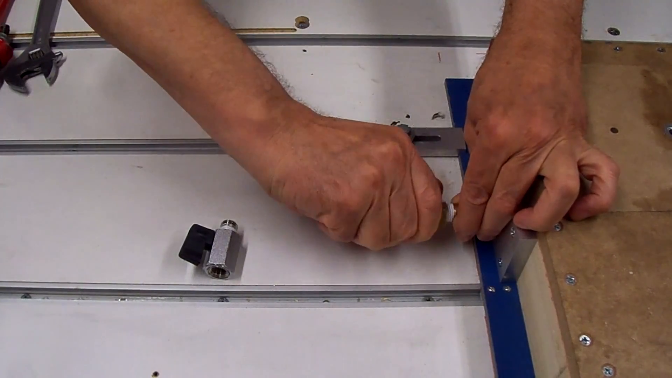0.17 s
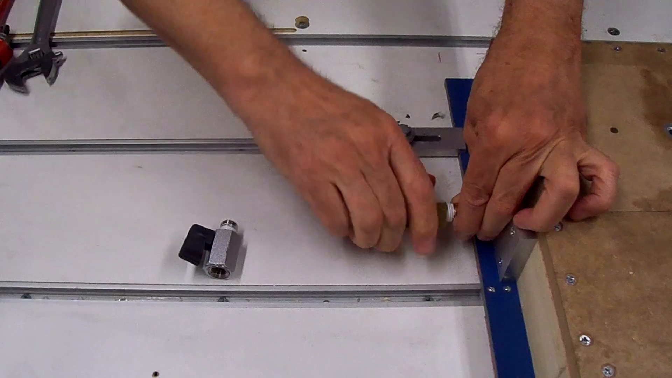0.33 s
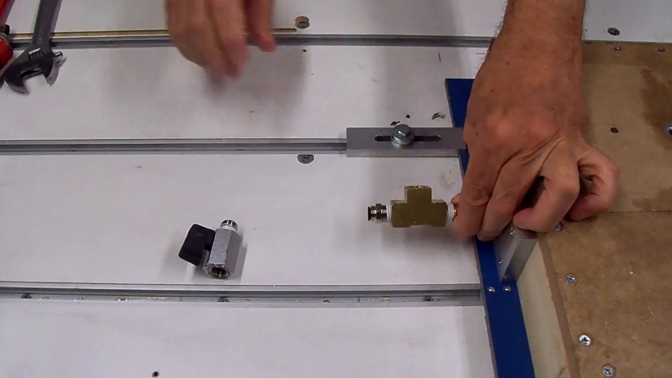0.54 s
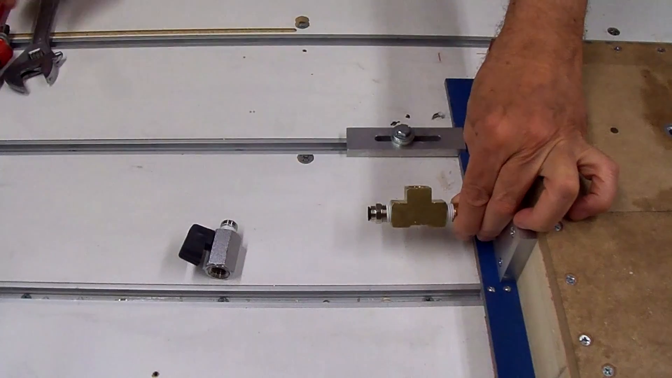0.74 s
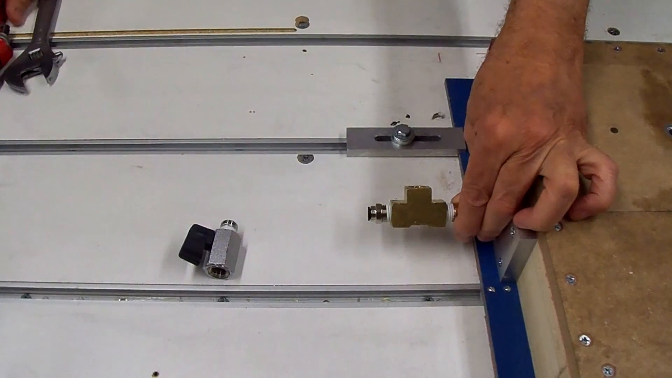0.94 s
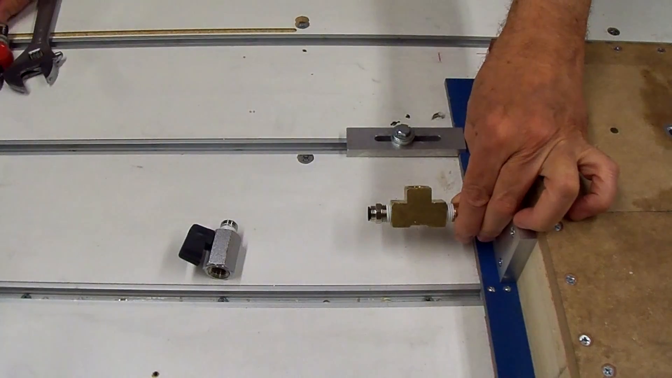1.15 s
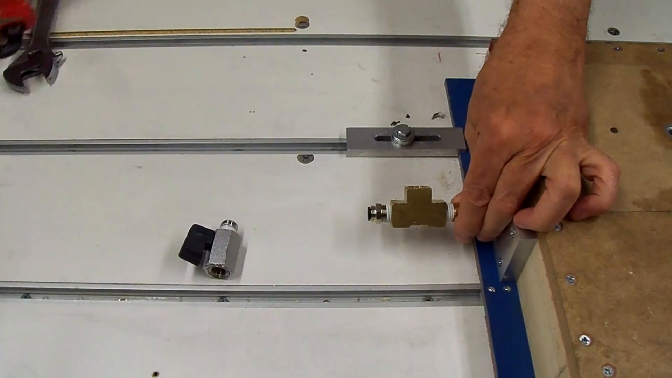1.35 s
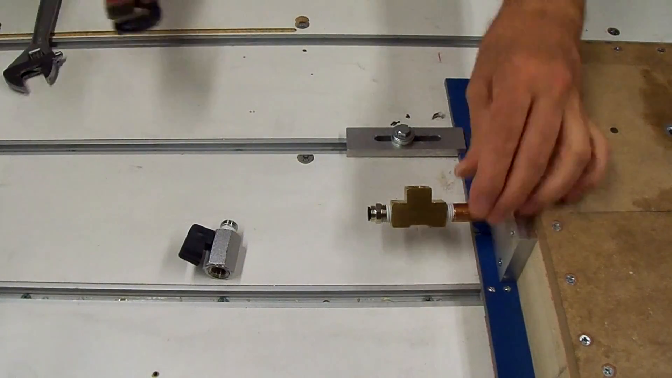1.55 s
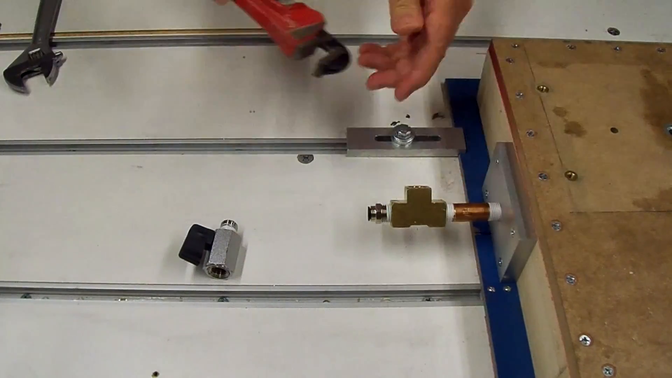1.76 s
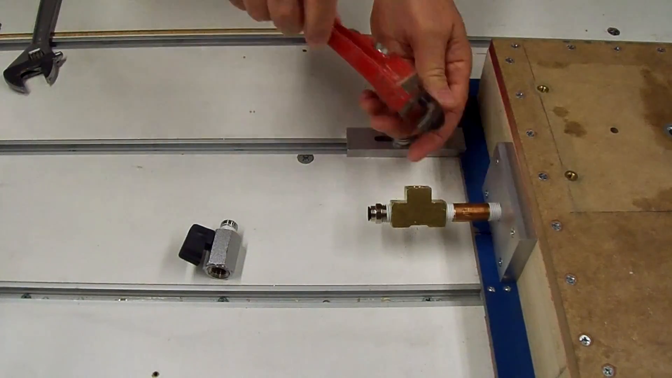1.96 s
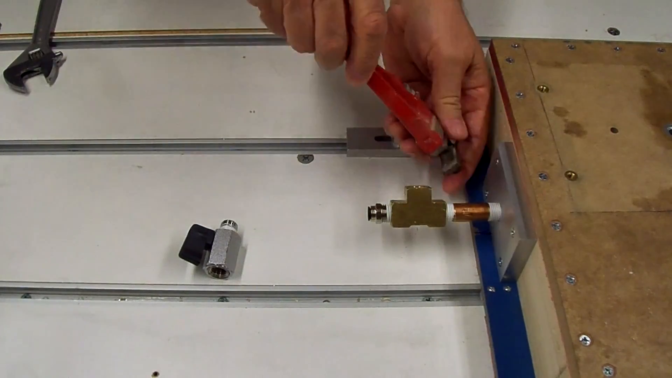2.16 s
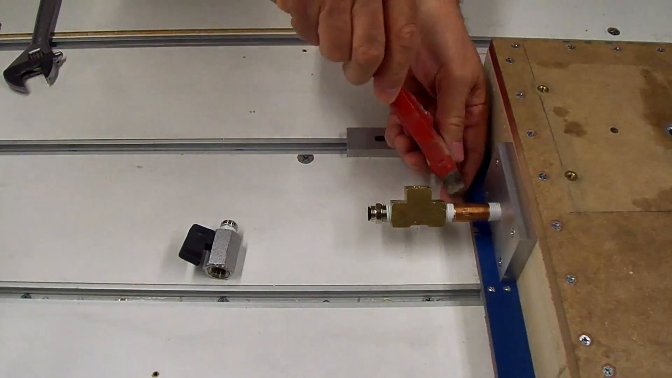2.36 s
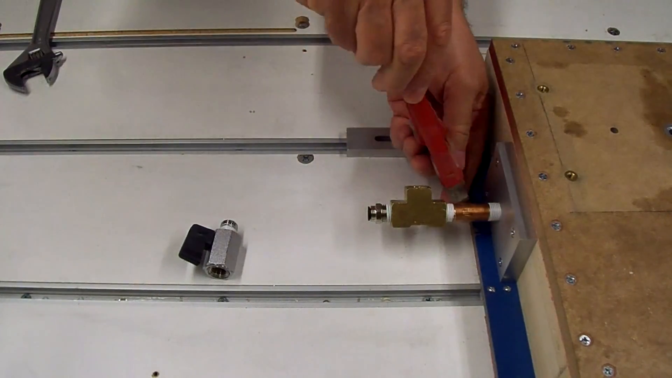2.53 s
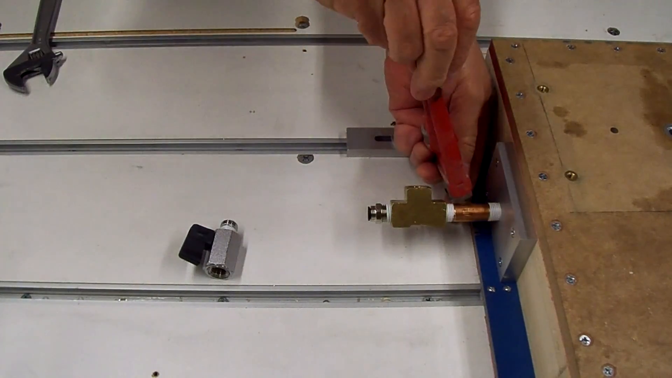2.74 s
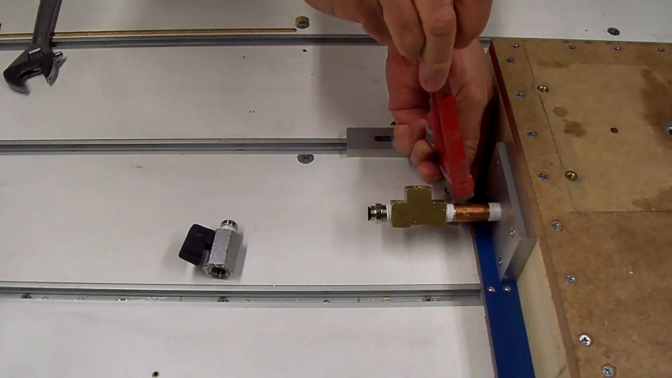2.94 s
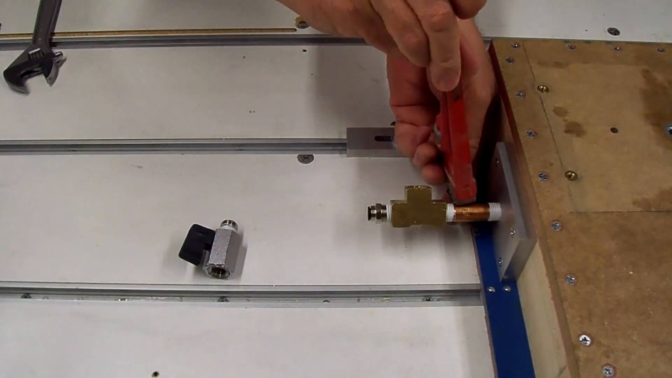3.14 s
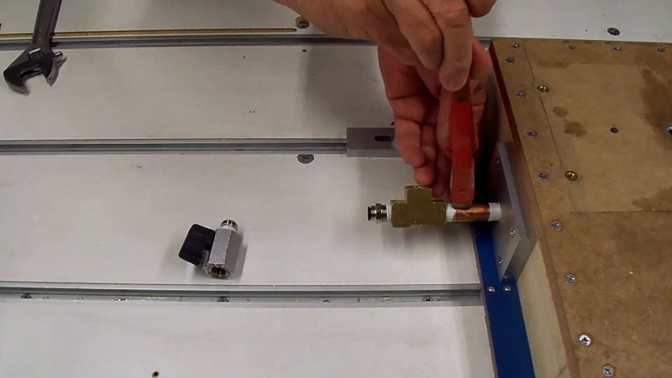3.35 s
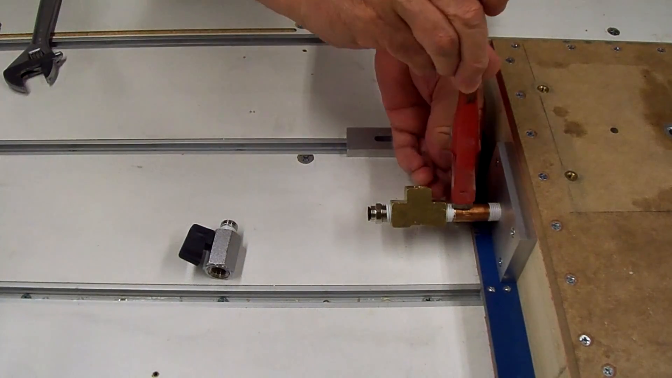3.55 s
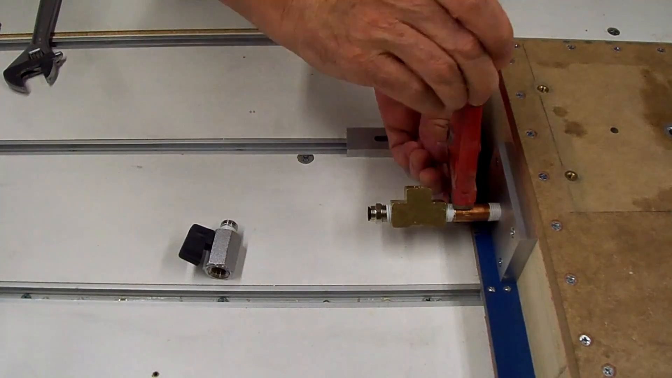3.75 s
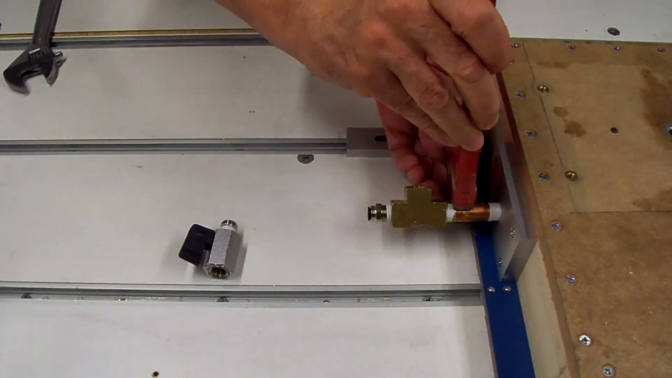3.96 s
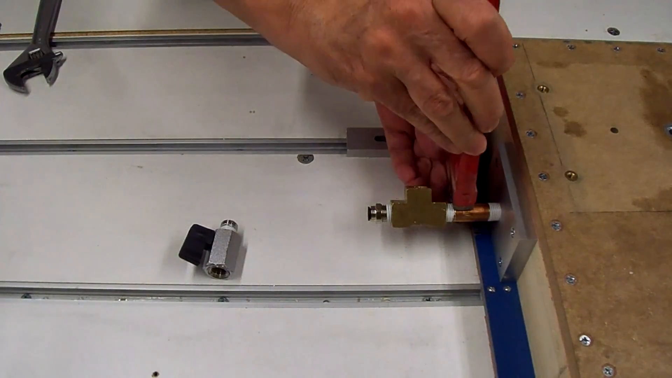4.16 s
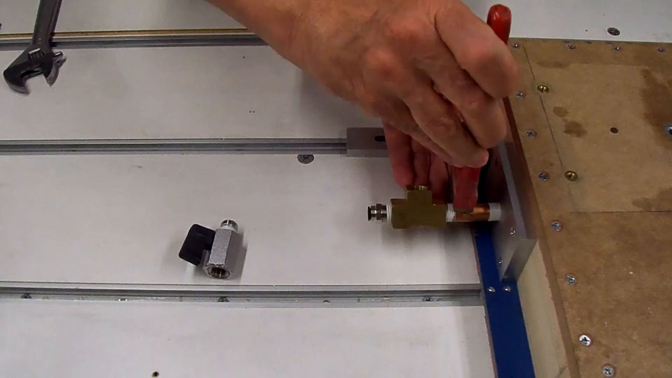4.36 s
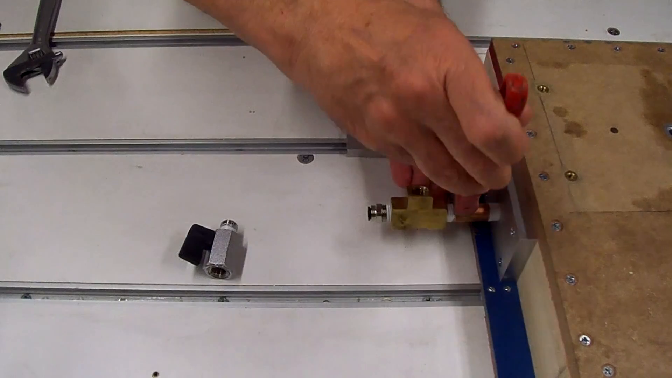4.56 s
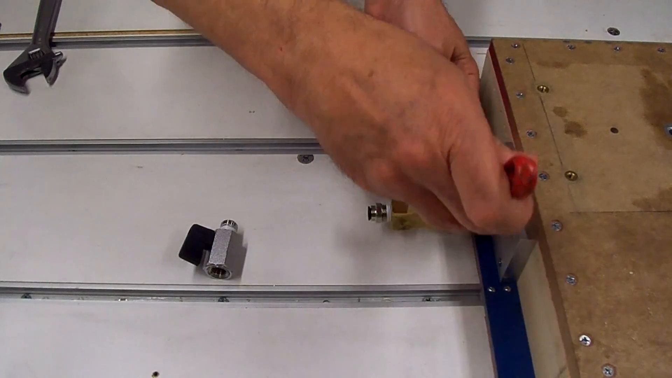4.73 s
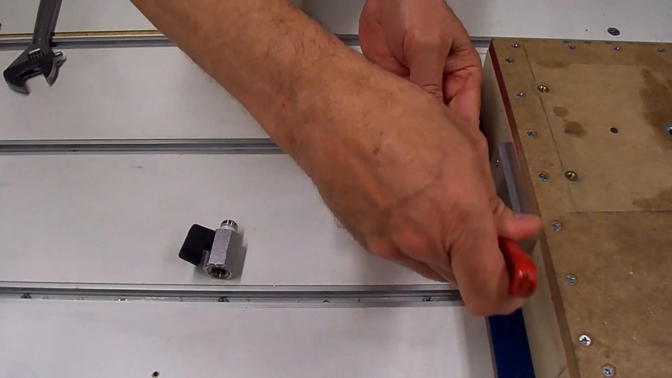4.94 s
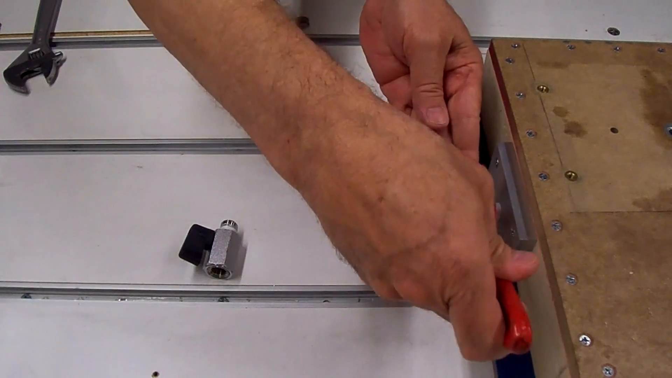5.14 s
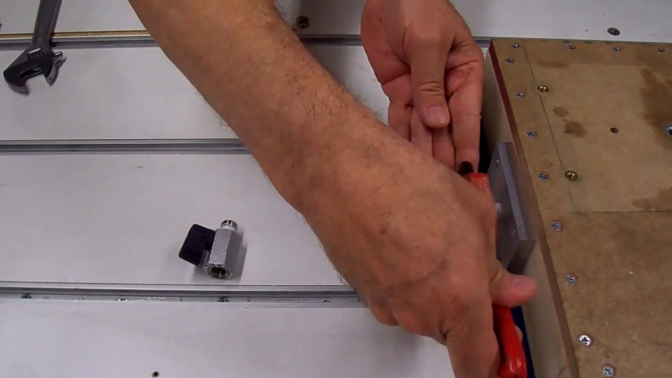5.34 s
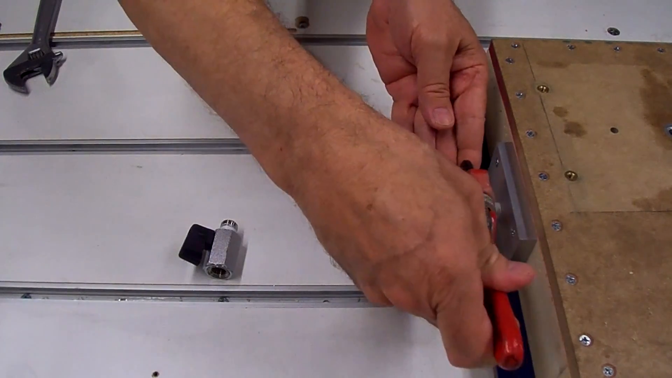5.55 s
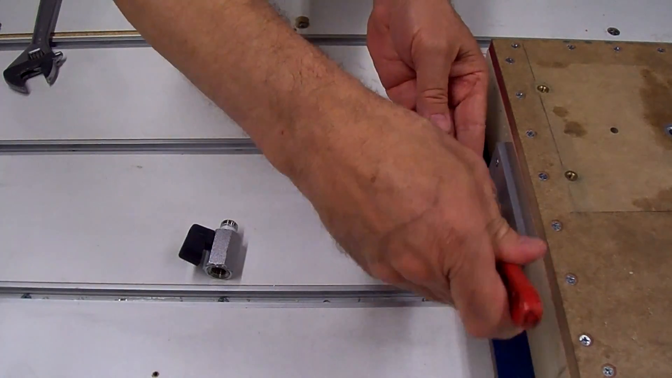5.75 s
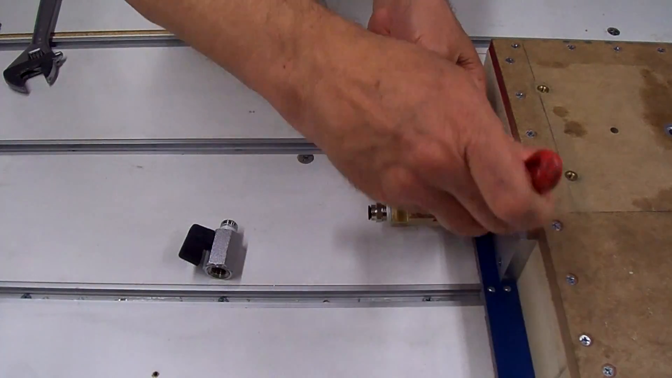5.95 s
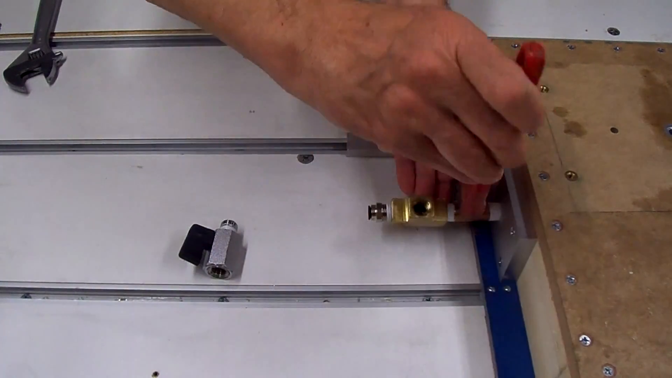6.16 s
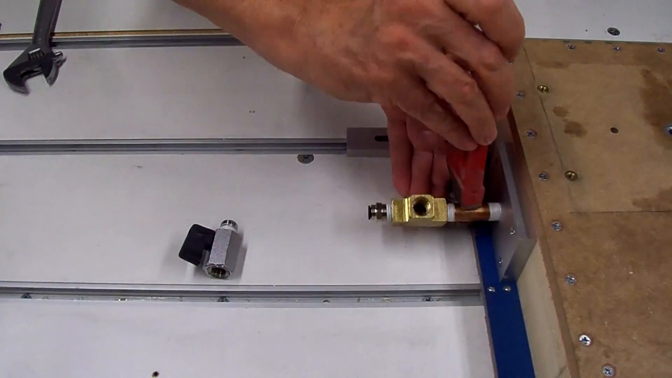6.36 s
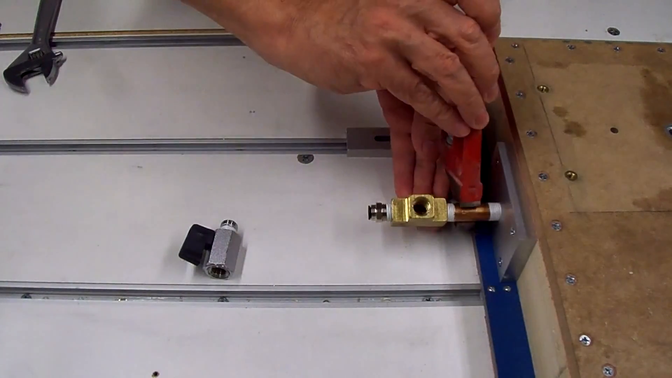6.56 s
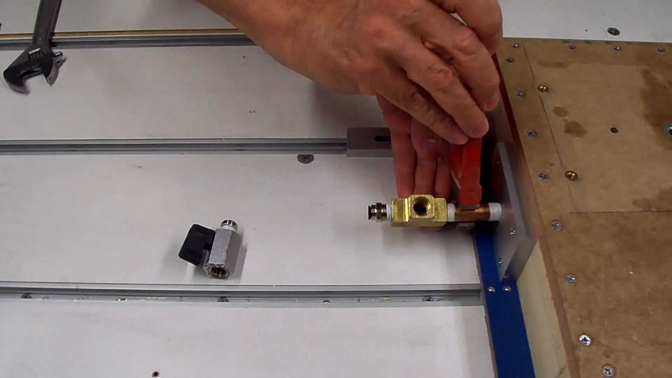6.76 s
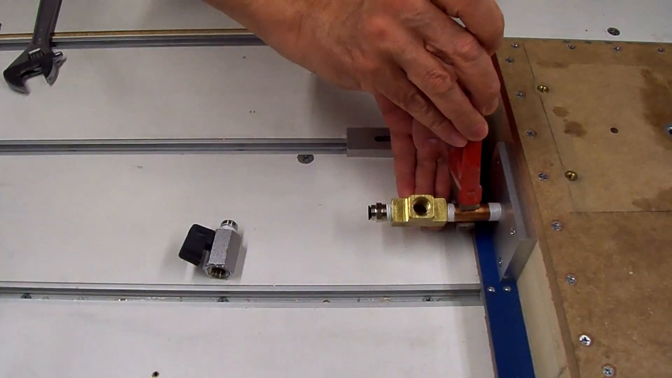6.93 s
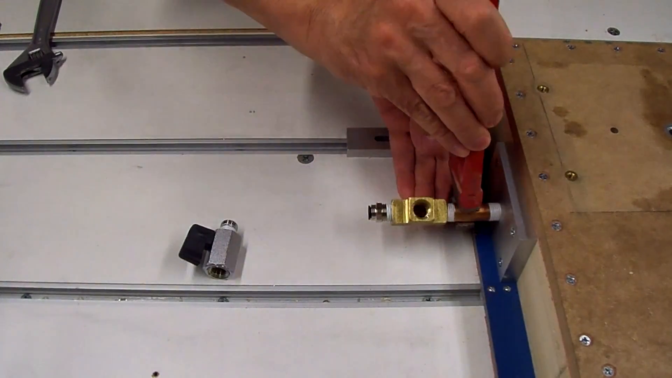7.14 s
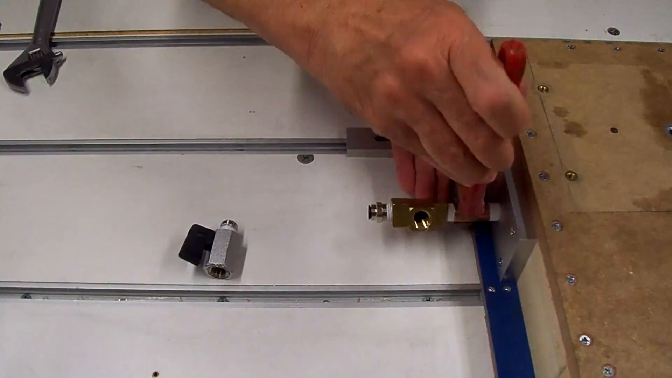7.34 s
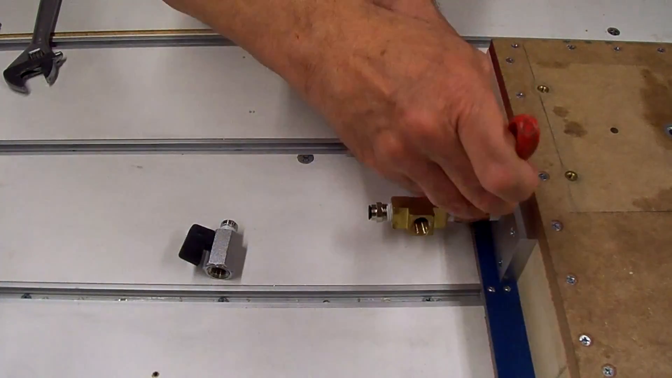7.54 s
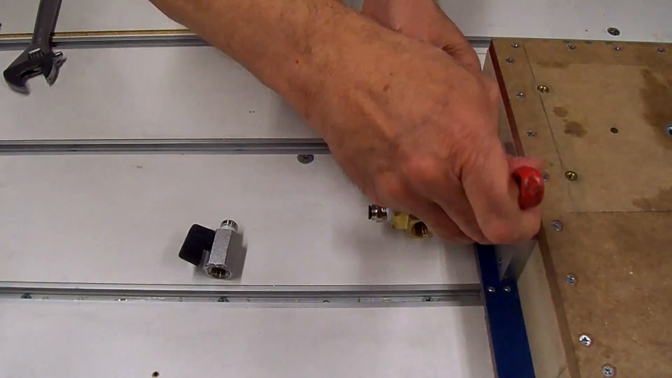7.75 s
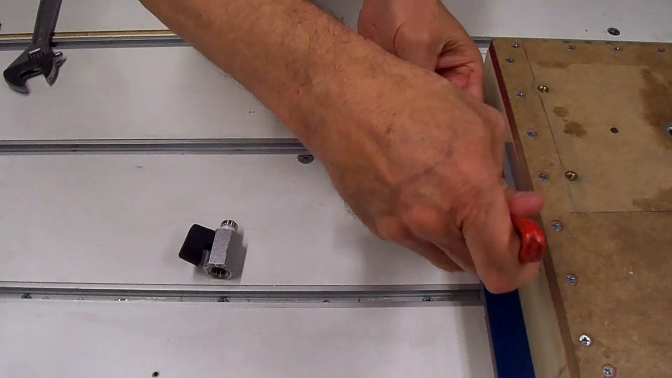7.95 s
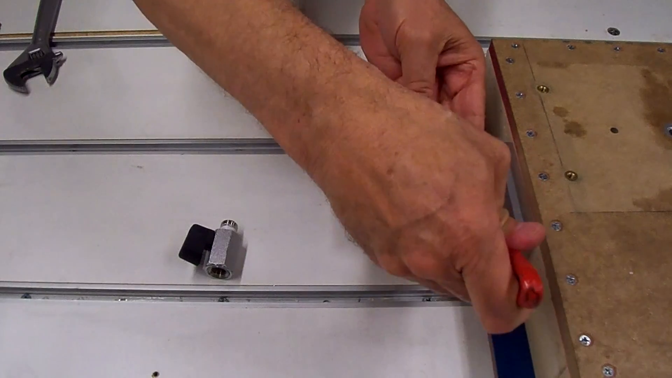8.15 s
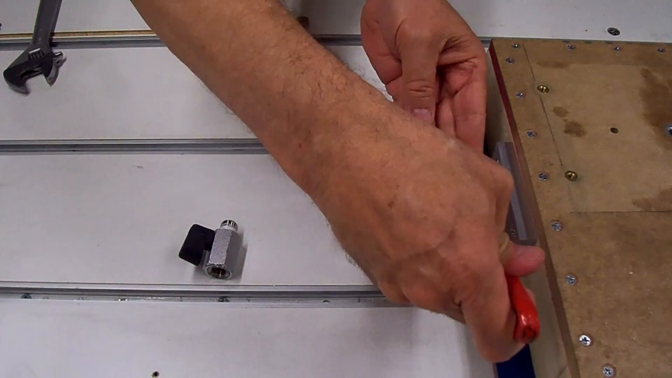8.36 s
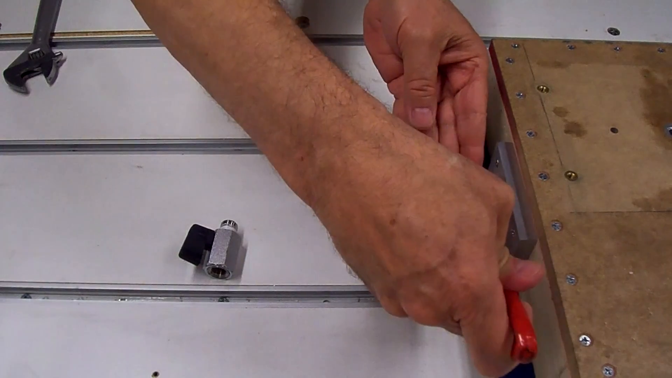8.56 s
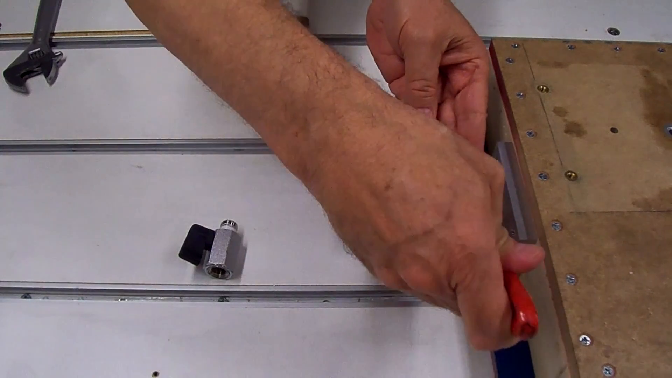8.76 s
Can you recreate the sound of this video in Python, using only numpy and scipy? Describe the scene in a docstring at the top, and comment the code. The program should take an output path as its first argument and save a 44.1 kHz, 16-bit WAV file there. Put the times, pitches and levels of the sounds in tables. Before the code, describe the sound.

A pipe wrench is picked up and used on a brass fitting. Soft skin rubbing gives way to quick bench thumps, bright jaw clinks and a swish. Small clinks follow, then dry metallic clacks and knocks in two main bursts, separated by near quiet, with a woody boom from the jig and short room tails. Low steady room noise throughout; close, mono, slightly dull at the very top.

```python
"""A small pipe wrench bites, slips and knocks on a brass tee being screwed onto a pipe nipple, and the
wooden jig that holds the nipple booms: each knock is noise bursts plus damped modes in six registers.
Before that the wrench is lifted, bumping the bench, and its loose jaw clinks as three groups of modes.
Treble ticks and tooth drags are short band noise; hands rub and slide as swells of shaped noise.
Under it all lie a low room noise and two faint steady tones."""
import sys
import numpy as np
from scipy import signal
from scipy.fft import rfft, irfft, next_fast_len
from scipy.io import wavfile
from scipy.ndimage import uniform_filter1d

SR = 44100
rng = np.random.default_rng(int(sys.argv[2]) if len(sys.argv) > 2 else 0)


def wrap_up_sound(samples):
    """Save the sound to the file named by the first command line argument, as 16-bit audio."""
    columns = np.atleast_2d(samples).T
    # keep every value between -1 and 1, then stretch to whole-number steps
    tamed = np.clip(columns, -1, 1)
    steps = np.round(tamed * 32767).astype(np.int16)
    wavfile.write(sys.argv[1], SR, steps)


N = 392490
TIME = np.arange(N) / SR  # the whole scene [s]
HIT_TIME = np.arange(int(.6 * SR)) / SR  # the life of one hit [s]

# Event levels are relative within each layer; ring shares scale the decay times.
# Wrench on the fitting: (time [s], clack level [dB], weight [dB], contact hardness [dB],
# share of the free ring time [1], favoured clack [Hz], pitch of the jig's answer [Hz])
BITES = [(3.1788, -30.5, -1, 3, .55, 2600, 2600), (3.2603, -23.5, -2, 4, 1, 3120, 350),
         (3.2756, -23, 11, -1.5, 0.6, 3150, 1450), (3.49, -34, 10, 1, 0.41, 3400, 1480),
         (3.7968, -19.5, -21, -1, 0.66, 3120, 1450), (3.8683, -15, -8, 9.5, 0.78, 2620, 705),
         (5.619, -23, -4.5, 0, 1, 3360, 1480), (5.656, -9.5, 1.5, 6.5, 0.72, 3180, 760),
         (5.796, -21, 4.5, 4, 1, 2520, 910), (5.9548, -26, 4.5, -21, 0.84, 2420, 890),
         (6.0593, -20.5, 3, -4, 0.86, 2450, 540), (6.0931, -30, 5, 2, 1, 2590, 750),
         (6.3151, -39, 17, 0, 0.8, 3250, 163), (6.4873, -31, 4.5, 14.5, .53, 3800, 1550),
         (6.611, -35.5, 12.5, 0, 0.97, 3490, 990), (6.6428, -13.5, 0.5, -7.5, 0.65, 2820, 202),
         (6.6739, -15, 0, -6, .75, 2670, 520), (6.7769, -23.5, -2.5, -1, 0.44, 2580, 1670),
         (6.7986, -20, -7, -5.5, 0.53, 3220, 1550), (8.8439, -23, -8, 7.5, 0.61, 3650, 3680)]
# Make-up of a bite, rows thud, knock, rap, clack, snap, tick:
# (level relative to the clack setting [dB], change with weight [dB/dB], change with hardness [dB/dB])
BITE_COLOUR = [(-7.5, 1, 0), (-11.5, 0.5, 0.16), (-10, 0.16, 0.21), (1, 0, 0), (-21, 0, 0.96),
               (-26, 0.5, 1.64)]
# Wrench on the bench: (time [s], clack level [dB])
BUMPS = [(1.1627, -28.5), (1.2239, -23), (1.2305, -22.5), (1.275, -25), (2.7601, -45)]
# Make-up of a bump: relative levels of thud, knock, rap, clack, snap, tick [dB]
BUMP_COLOUR = [0.5, 5.5, 4.5, 1, -13.5, -26]
# Pitches that every bump favours [Hz]
BENCH_FAVOURED_HZ = [280, 780, 950, 1190, 1450, 2350]
# Rattles of the loose jaw: (time [s], low ring level [dB], middle ring re low [dB],
# high ring re low [dB], share of the free ring time [1])
CLINKS = [(1.1638, -32.5, -19, -20, 1), (1.23, -20, -18, -7, 1), (1.298, -31, -5.5, -6, 0.96),
          (1.33, -36, -12, -6, 0.67), (1.3855, -16.5, -38, -27, .59), (2.1113, -32.5, -26, -26, 0.69),
          (2.196, -24.5, -31, -32, .71), (2.747, -36.5, -20, -15, .95), (3.1782, -37.5, -9, -8, .9),
          (3.2622, -32.5, -17, -13, 1), (6.6085, -42, -12, 0, 1)]
# Short treble ticks, some alone, some the bright crack of a hard bite: (time [s], level [dB])
TICKS = [(0.3322, -17), (1.3518, -26), (2.1956, -25), (2.746, -37), (3.8679, -17), (5.6572, -14.5),
         (6.218, -36)]
# Teeth dragging on the pipe: (time [s], length [s], level [dB])
DRAGS = [(3.23, 0.06, -44), (3.459, .03, -51), (5.627, 0.035, -36), (6.026, .025, -45),
         (6.332, 0.063, -53.5), (6.62, .032, -42), (6.763, .01, -42)]
# Fingers rubbing on the brass and shifting the wrench: (time [s], hold [s], level [dB])
RUBS = [(.66, 0.093, -50.5), (1.0, 0.13, -54.5), (1.265, .09, -46.5)]
# A brief sliding swish: (time [s], hold [s], level [dB])
SLIDE = [(1.542, 0.029, -34)]
# The wrench leaning on the jig, which hums: (time [s], hold [s], level [dB])
LEANS = [(3.29, 0.19, -41.5), (5.81, 0.54, -41.5), (7.17, .08, -47)]

# Free modes of the fitting in its jig: (frequency [Hz], level [dB], t60 [s])
JIG_MODES = [(118.5, -4.5, 0.3), (166.2, 2.5, 0.36), (205.4, 1.5, 0.12), (251, 2, 0.12), (324, -0.5, 0.16),
             (392.7, -3, 0.43), (517, -7.5, 0.29), (655, 3.5, 0.088), (767, 0, 0.16), (910, -9.5, 0.49),
             (996, 0, 0.19), (1323, -0.5, 0.11), (1456, 4, 0.083), (1690, -12, 0.22), (1900, -1, 0.098),
             (1963, -1, 0.14), (2213, -6, 0.13), (2377, 0, 0.11), (2620, 4, 0.059), (3160, -4, 0.094),
             (3400, 7.5, 0.028), (3794, -4, 0.074), (4140, -10, 0.079), (4830, 8, 0.031), (6160, -1, 0.077),
             (8060, -1, 0.061), (9250, -28, 0.037), (11340, 2, 0.076), (11950, 0, .05), (12750, 6, 0.04)]
# Free modes of the bench top: (frequency [Hz], level [dB], t60 [s])
BENCH_MODES = [(193, 9, 0.15), (293, 1.5, 0.19), (400, 2.5, 0.26), (513, -0.5, 0.41), (580, -3, 0.13),
               (692, -3.5, 0.46), (850, -5, 0.22), (942, 2.5, 0.089), (1170, 7, 0.095), (1304, 7.5, .11),
               (1447, 6, 0.07), (1630, 1.5, 0.14), (1870, 3, 0.1), (2380, -2, 0.12)]
# Free modes of the steel jaw: (frequency [Hz], level [dB], t60 [s])
JAW_MODES = [(3690, 3.5, 0.046), (3990, 11, 0.066), (4030, 0, 0.2), (5060, 0, 0.056), (9130, 2, 0.12),
             (11070, -14.5, .11)]
# Registers of a blow, rows thud, knock, rap, clack, snap, tick: (low edge [Hz], high edge [Hz],
# burst t60 before softening [s], ring level [dB], room level [dB], room t60 [s], gain [dB])
REGISTERS = [(117.3, 439, 0.11, 2, 0, 0.37, 5.5), (452, 1250, 0.13, 1.5, 0, 0.36, 4),
             (1307, 2086, 0.033, -6.5, -10, 0.32, 2), (2130, 4230, 0.035, -4, -13, 0.29, -4.5),
             (4080, 8360, 0.009, -8, -11, 0.16, 1), (8800, 12800, 0.0049, -13.5, -23.5, 0.21, 5.5)]

# Spectrum of the sliding swish: (frequency [Hz], relative level [dB])
SWISH_SPECTRUM = [(120, -32), (200, 2), (445, -4), (829, -0.5), (1200, -13), (1320, -7), (1690, -9),
                  (3560, -4.5), (14000, -18.5)]
# Spectrum of skin on the work: (frequency [Hz], relative level [dB])
SKIN_SPECTRUM = [(300, -5), (700, 2), (2500, 5), (6000, -4), (13000, -3)]
# Spectrum of the room noise: (frequency [Hz], relative level [dB])
ROOM_SPECTRUM = [(11, -32), (18, -1), (123, -5.5), (240, -9.5), (276, -11), (481, -14), (523, -15.5),
                 (864, -19), (1880, -25), (2290, -24), (3200, -26.5), (11800, -32), (14000, -32.5)]
# Course of the room noise: (time [s], level [dB])
ROOM_LEVEL = [(0, -41.5), (5.5, -41), (7.2, -43)]
# Faint steady tones: (frequency [Hz], peak level [dB])
WHINE = [(2277, -65.5), (7881, -78)]

ANSWER_DB, ANSWER_WIDTH = 1.5, 0.2  # the jig's answer: strength, width as a share of its pitch
THUD_HZ, DEEP_THUD_HZ = 320, 169.7  # favoured thud of a light and of a weighty blow
DEEP_ABOVE_DB = 1.5  # the weight that parts them
TOP_HZ = 14150  # upper band limit


def amp(db):
    """Logarithmic level: decibels become an amplitude ratio."""
    return 10 ** (np.asarray(db) / 20)


def unit(x):
    """Power normalisation: scale to rms 1."""
    return x / np.sqrt(np.mean(x ** 2) + 1e-20)


def onset_unit(x):
    """Onset normalisation: scale a hit to rms 1 over its first fiftieth of a second."""
    return x / np.sqrt(np.mean(x[:SR // 50] ** 2) + 1e-20)


def fade(t60):
    """Exponential decay: the level falls 60 dB in t60 seconds."""
    return amp(-60 * HIT_TIME / max(t60, 1e-3))


def add(track, s, x):
    """Superposition: mix x into the track at time s."""
    part = track[max(round(s * SR), 0):][:len(x)]
    part += x[:len(part)]


def band_noise(low_hz, high_hz):
    """Band-pass filtering: hit-length noise of rms 1 between two steep edges."""
    edges_hz = [low_hz, min(high_hz, SR * .49)]
    sos = signal.butter(N=9, Wn=edges_hz, btype="bandpass", fs=SR, output="sos")
    noise = signal.sosfilt(sos, rng.standard_normal(2 * len(HIT_TIME)))
    return unit(noise[len(HIT_TIME):])  # the filter has settled by here


def coloured(spectrum):
    """Spectral shaping: scene-length noise of rms 1, weighted by a (Hz, dB) curve."""
    size = next_fast_len(N)
    curve_hz, curve_db = np.transpose(spectrum)
    bin_hz = np.fft.rfftfreq(size, 1 / SR)
    gain = amp(np.interp(np.log(bin_hz + 1), np.log(curve_hz), curve_db))
    return unit(irfft(rfft(rng.standard_normal(size)) * gain, size)[:N])


def resonate(x, hz, width_hz):
    """Resonance: what a single peak of the given width lets through."""
    return signal.lfilter(*signal.iirpeak(hz, hz / width_hz, fs=SR), x)


def strokes(rows, attack_s, release_s):
    """Gesture envelope: a 60 dB climb in attack_s, a hold, a 60 dB fall in release_s."""
    total = 0
    for s, hold, db in rows:
        before = np.maximum(s - TIME, 0) / attack_s
        after = np.maximum(TIME - s - hold, 0) / release_s
        total = total + amp(db - 60 * (before + after))
    return total


def ring(modes, free=1):
    """Modal superposition: damped sines, struck at slightly new strengths every time."""
    out = np.zeros(len(HIT_TIME))
    for hz, db, t60 in modes:
        strength = amp(db + rng.normal(0, 2))
        sine = np.sin(2 * np.pi * (hz * HIT_TIME + rng.random()))
        out += strength * fade(t60 * free) * sine
    return out


def blow(modes, levels_db, favoured_hz, free, softness, rise_cycles, favour_db,
         contact_s=0.00056, favour_width=0.18):
    """Impact excitation: each register sums a short burst, the body's modes and the room's tail."""
    out = np.zeros(len(HIT_TIME))
    for register, db in zip(REGISTERS, levels_db):
        low, high, burst_t60, ring_db, room_db, room_t60, gain_db = register
        burst = band_noise(low, high) * fade(burst_t60 * softness * free)
        modes_here = [mode for mode in modes if low <= mode[0] < high]
        body = amp(ring_db) * ring(modes_here, free)  # a firm grip damps the ring
        room = amp(room_db) * free * band_noise(low, high) * fade(room_t60)
        # low registers take longer to get going
        rise = 1 - np.exp(-HIT_TIME / (contact_s + rise_cycles / low))
        part = rise * (burst + body + room)
        # the point of contact favours some pitches
        favoured_here = [hz for hz in favoured_hz if low < hz < high]
        favoured = sum(resonate(part, hz, favour_width * hz) for hz in favoured_here)
        out += amp(db + gain_db) * onset_unit(part + amp(favour_db) * favoured)
    return out


def room_noise():
    """Stationary noise: ventilation rumble and hiss of slowly drifting level, with two faint tones."""
    tones = sum(amp(db) * np.sin(2 * np.pi * hz * TIME) for hz, db in WHINE)
    level = amp(np.interp(TIME, *np.transpose(ROOM_LEVEL)))
    return level * coloured(ROOM_SPECTRUM) + tones


def ticks(level_db, low_db, room_db):
    """Decaying band noise: short treble ticks, some alone, some the bright crack of a hard bite."""
    track = np.zeros(N)
    for s, db in TICKS:
        hiss = band_noise(10000, 14000) + amp(low_db) * band_noise(2800, 8500)
        decay = fade(0.0071) + amp(room_db) * fade(0.16)  # the second term is a trace in the room
        add(track, s, amp(db + level_db) * hiss * decay)
    return track


def hands(bench_db):
    """Sliding friction: skin rubs on the work as swelling noise; one quick slide stirs the bench top."""
    rub = strokes(RUBS, attack_s=.6, release_s=.45) * coloured(SKIN_SPECTRUM)
    slide = strokes(SLIDE, attack_s=0.059, release_s=0.27) * coloured(SWISH_SPECTRUM)
    # a mode's bandwidth is about 2.2 / t60
    bench = sum(resonate(slide, hz, 2.2 / t60) for hz, db, t60 in BENCH_MODES)
    return rub + slide + amp(bench_db) * bench


def bumps(level_db, free, softness, rise_cycles, favour_db):
    """Impact on a plate: the wrench knocks on the bench top, with only its strength set anew."""
    track = np.zeros(N)
    for s, db in BUMPS:
        hit = blow(BENCH_MODES, BUMP_COLOUR, BENCH_FAVOURED_HZ, free, softness, rise_cycles, favour_db)
        add(track, s, amp(db) * hit)
    return amp(level_db) * track


def jaw(level_db, middle_db, high_db, room_db, room_t60):
    """Modal ringing: the loose jaw sounds in three groups of modes, each lingering in the room."""
    track = np.zeros(N)
    rise = 1 - np.exp(-HIT_TIME / 0.00061)
    for s, db, middle_rel_db, high_rel_db, free in CLINKS:
        groups = [(JAW_MODES[:3], 0),
                  (JAW_MODES[3:4], middle_rel_db + middle_db),
                  (JAW_MODES[4:], high_rel_db + high_db)]
        for modes, rel_db in groups:
            air = rng.standard_normal(len(HIT_TIME))
            tail = unit(sum(amp(mode_db) * resonate(resonate(air, hz, 110), hz, 110)
                            for hz, mode_db, t60 in modes))
            lingering = amp(room_db) * tail * fade(room_t60 * free)
            clink = rise * (onset_unit(ring(modes, free)) + lingering)
            add(track, s, amp(db + rel_db + level_db) * clink)
    return track


def bites(level_db, softness, rise_cycles, favour_db):
    """Impact spectrum: weight feeds the boom, hardness the snap, and the jig answers at one pitch."""
    track = np.zeros(N)
    for s, db, weight_db, hard_db, free, clack_hz, answer_hz in BITES:
        levels_db = [db + rel_db + by_weight * weight_db + by_hardness * hard_db
                     for rel_db, by_weight, by_hardness in BITE_COLOUR]
        thud_hz = DEEP_THUD_HZ if weight_db > DEEP_ABOVE_DB else THUD_HZ
        hit = blow(JIG_MODES, levels_db, [thud_hz, clack_hz], free, softness, rise_cycles, favour_db)
        answer = amp(ANSWER_DB) * resonate(hit, answer_hz, ANSWER_WIDTH * answer_hz)
        add(track, s, hit + answer)
    return amp(level_db) * track


def drags():
    """Rough friction: steel teeth scrape over the pipe in a swell of two-band noise."""
    track = np.zeros(N)
    for s, length, db in DRAGS:
        swell = np.sin(np.pi * np.clip(HIT_TIME / length, 0, 1))
        scrape = band_noise(2330, 3830) + amp(-4) * band_noise(630, 2270)
        add(track, s, amp(db) * swell * scrape)
    return track


def strain(upper_db):
    """Forced resonance: small shifts of the grip, as noise, keep three low jig modes stirring."""
    push = rng.standard_normal(N)
    boom_hz = JIG_MODES[1][0]
    boom = unit(resonate(resonate(push, boom_hz, 18), boom_hz, 18))
    upper = unit(sum(resonate(resonate(push, hz, 52), hz, 52) for hz, db, t60 in JIG_MODES[3:5]))
    return strokes(LEANS, attack_s=1.0, release_s=0.78) * (boom + amp(upper_db) * upper)


def scene():
    """Superposition of every source at the bench, in mono."""
    fitting = bites(level_db=-10.5, softness=1.77, rise_cycles=0.3, favour_db=5.5) + strain(upper_db=-5.0)
    bench = bumps(level_db=-11.5, free=0.74, softness=1.4, rise_cycles=0.38, favour_db=3.5)
    clinks = jaw(level_db=-13.0, middle_db=7.0, high_db=6.5, room_db=-5.5, room_t60=0.18)
    bright = clinks + ticks(level_db=-6, low_db=-8, room_db=-15.5) + drags()
    return (fitting + bench + bright + hands(bench_db=2) + room_noise())[None]


def record(dry):
    """Low-pass filtering: the spectrum falls away very steeply above the band limit."""
    size = next_fast_len(N + 4096)
    hz = np.fft.rfftfreq(size, 1 / SR)
    loss = np.sqrt(1 + (hz / TOP_HZ) ** 160)
    return irfft(rfft(dry, size) / loss, size)[:, :N]


dry = scene()
out = record(dry)
wrap_up_sound(out)
```